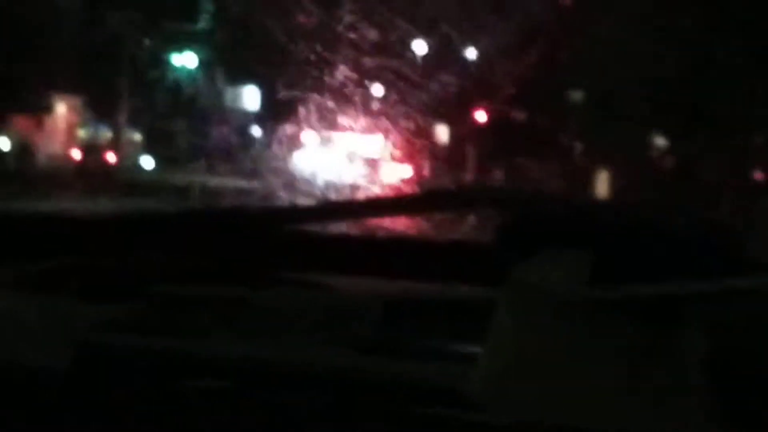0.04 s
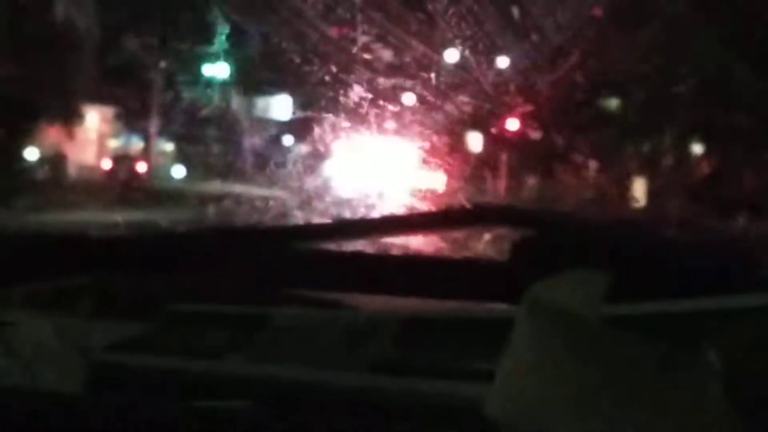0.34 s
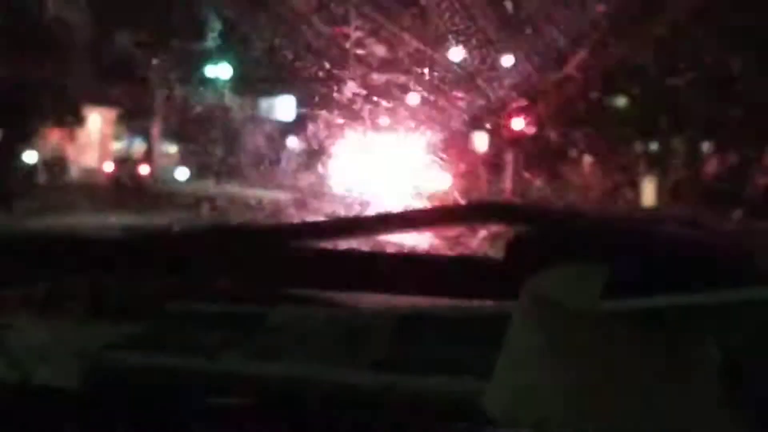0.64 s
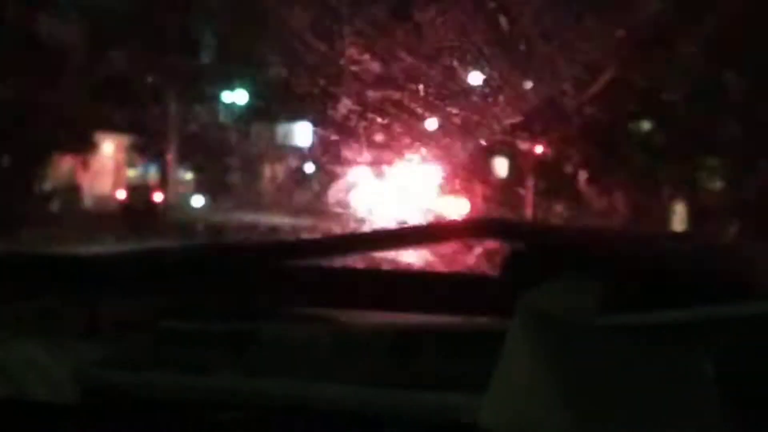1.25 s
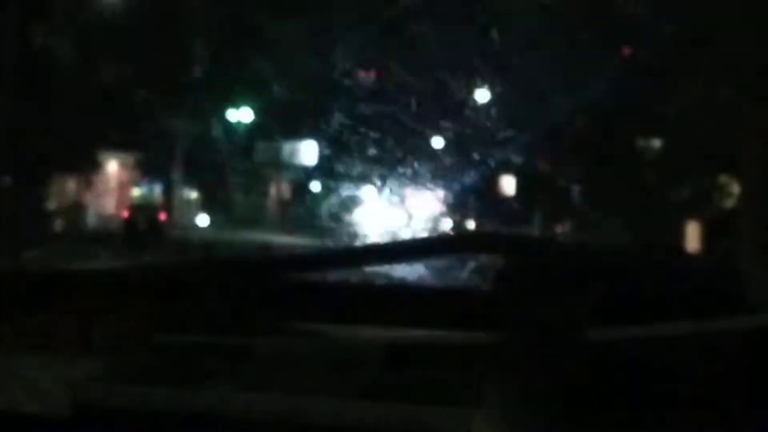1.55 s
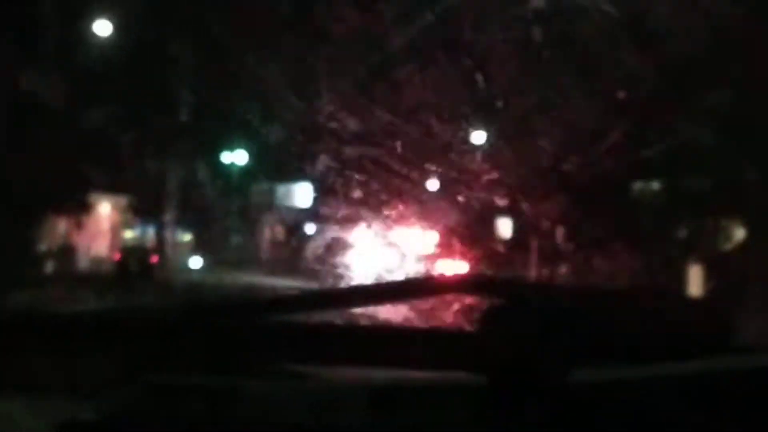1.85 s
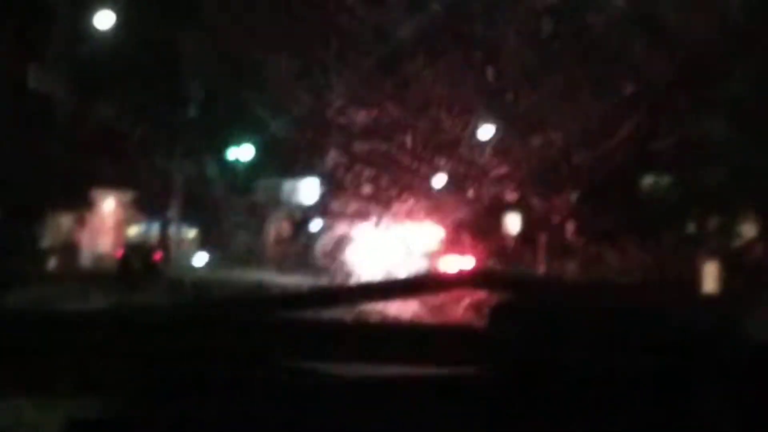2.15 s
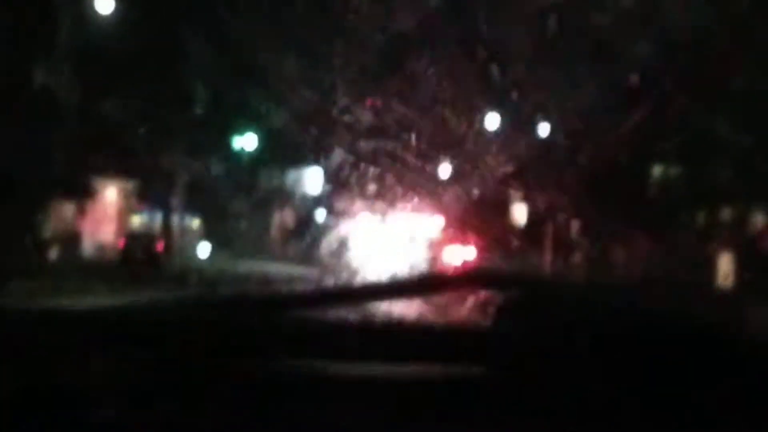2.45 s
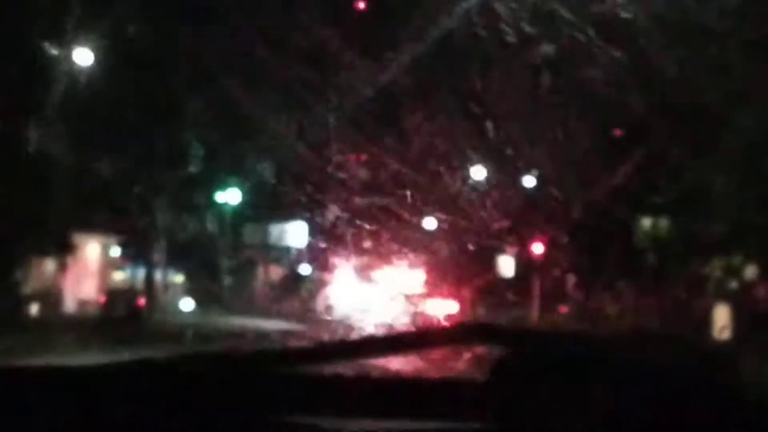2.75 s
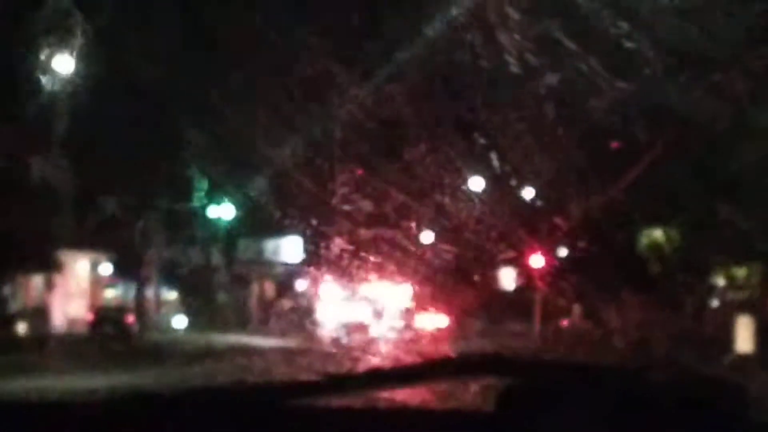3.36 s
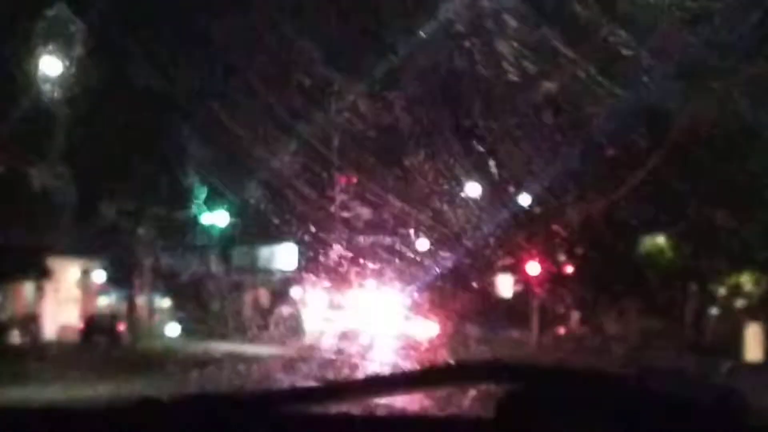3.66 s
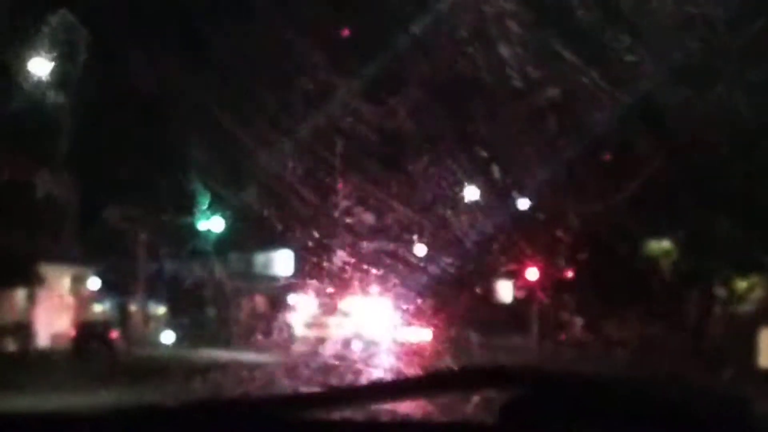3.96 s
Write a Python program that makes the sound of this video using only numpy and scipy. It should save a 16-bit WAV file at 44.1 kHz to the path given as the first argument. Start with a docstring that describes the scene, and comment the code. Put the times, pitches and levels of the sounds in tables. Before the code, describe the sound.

An engine rises in pitch until about 3.4 seconds, then eases, over road rumble, wet tyre wash and faint diesel clatter, heard inside a car. A sharp double air hiss opens. The microphone bumps at 0.5 seconds as a softer, faintly whistling hiss lasts to about 1.5. A loud air blast with a knock comes at 2.5. Small rustles dot the second half, with tyre swishes near 2.9 and 3.2.

```python
"""Pulling away on a wet street

Inside a car at night, behind a fire truck. The engine's firing tones climb and ease off over road
rumble, tyre wash and a steady diesel clatter. Three hisses like released air stand out, jets of noise
with a faint whistle. Small rustles, wet swishes, a knock and a bump on the microphone dot the ride."""
import sys
import numpy as np
from scipy import signal
from scipy.fft import rfft, irfft
from scipy.io import wavfile
from scipy.ndimage import uniform_filter1d

SR = 44100
rng = np.random.default_rng(int(sys.argv[2]) if len(sys.argv) > 2 else 0)


def transcribe(u):
    """Save the signal u as a 16-bit wav file named by the first command-line argument.

    u: samples, shape (n,) or (channels, n), limited to [-1, 1]; the rate is SR.
    q: integer samples, one column per channel.
    """
    v = np.clip(np.atleast_2d(u).T, -1, 1)
    q = np.round(v * 32767).astype(np.int16)
    wavfile.write(sys.argv[1], SR, q)


N = 176400
T, HZ = np.arange(N) / SR, np.fft.rfftfreq(N, 1 / SR)

# The revs (time [s], firing rate [Hz])
ENGINE_REVS = [(0, 81.17), (1, 90.92), (2, 106.2), (3, 120.2), (3.35, 122.8), (3.58, 119.7), (3.78, 107.4),
               (4, 97.7)]
# Weight of the engine note (time [s], firing tone [dB], its octave [dB])
ENGINE_LEVELS = [(0, -61, -42), (.3, -51.5, -50), (.55, -39, -48), (1.05, -44.5, -46), (1.5, -43, -49.5),
                 (1.8, -35, -51), (2.35, -32, -48.5), (2.7, -43, -50.5), (3.1, -42.5, -46), (3.5, -41, -53),
                 (3.78, -31, -47.5), (4, -41.5, -58)]
# Weaker engine orders (pitch [x firing rate], level [dB])
ENGINE_ORDERS = [(.62, -58), (1.39, -54.5), (3, -55.5), (4, -57)]

# Noise bursts (start [s], attack [s], hold [s], release [dB/s], level [dB], tilt [dB/octave])
THIN_HISS_CUES = [(-.04, 0.085, 0.097, 168, -37.5, 1.5), (.17, 0.016, 0.047, 260, -45.5, -0.5)]
LONG_HISS_CUES = [(.43, 0.11, 0.55, 24.4, -53.5, 0)]
WIDE_HISS_CUES = [(2.415, 0.089, .055, 186, -35, 0)]
RUSTLE_CUES = [(1.665, .02, .005, 300, -55, 3), (1.71, 0.068, 0.011, 120, -51.5, -3.5),
               (2.06, 0.014, 0.013, 350, -51.5, -5), (2.139, 0.0024, 0.011, 334, -46.5, -4),
               (2.72, 0.049, 0.0094, 300, -49, -3), (2.812, 0.0024, 0.0057, 700, -48.5, -4.5),
               (2.865, 0.014, 0.014, 200, -43.5, -7), (3.2, 0.06, 0.11, 60, -57, -1),
               (3.321, 0.002, 0.004, 600, -48, 3), (3.555, 0.013, 0.014, 250, -55.5, -2.5),
               (3.795, 0.018, 0.011, 300, -55, -4), (3.89, 0.023, .01, 300, -54.5, -0.5)]
SWISH_CUES = [(2.868, 0.012, 0.11, 88.75, -50, 0), (3.215, 0.0067, 0.042, 44, -43.5, 0)]
# Tone colour of those bursts (frequency [Hz], relative level [dB])
THIN_HISS_EQ = [(300, -1), (1500, -6.5), (2100, 4), (2750, 3.5), (3300, -6), (4300, -3), (4850, 7.5),
                (5500, -1), (7400, -13.5), (9400, -19.5), (10300, -12), (15600, -10), (17000, -60)]
LONG_HISS_EQ = [(1000, -17), (2800, -6.5), (4100, -6), (5500, -2), (7500, -11.5), (9400, -12.5),
                (10500, -8), (12500, -10.5), (15400, -9), (17000, -60)]
WIDE_HISS_EQ = [(300, -11), (1200, 1.5), (2050, -7.5), (3100, 1.5), (4200, -0.5), (5400, 0.5), (7100, -3.5),
                (7800, -11.5), (9300, -6), (10500, -21), (12000, -7), (14600, -4), (15800, -7),
                (17000, -60)]
RUSTLE_EQ = [(800, -33), (3000, 9), (4200, 1.5), (7000, 0), (10000, -5), (14500, 2), (16000, -34.5)]
SWISH_EQ = [(400, -10), (1000, -2), (1900, 7), (3200, 1.5), (4200, -10.5), (5500, -10.5), (15000, -27)]
# Resonances of the air jets (frequency [Hz], half width [Hz], lift [dB])
THIN_JET_PEAKS = [(5400, 70, 5), (5930, 60, 5.5)]
WIDE_JET_PEAKS = [(2950, 91, 6.6), (3255, 25, 4.4), (6170, 41, 7), (6870, 30, 14)]
# Singing air (start [s], length [s], pitch [Hz], bend [Hz], width [Hz], level [dB])
WHISTLE_CUES = [(-.06, 0.14, 11840, -400, 60.3, -49), (.48, .16, 12400, 4000, 700, -55),
                (.62, 0.28, 5530, -220, 35, -58)]
# Sputter at the height of the first hiss (start [s], length [s], level [dB])
SPUTTER_CUES = [(0.105, 0.012, -35), (0.12, 0.027, -36.5)]
# Ring of the sputter and the knock (frequency [Hz], relative level [dB], 60 dB decay [s])
SPUTTER_RING = [(547, 2, 0.028), (1180, 3, 0.0086), (1870, -4.5, 0.021), (2720, -3, 0.011),
                (5300, -6, 0.0068)]
KNOCK_RING = [(1260, 1.5, 0.024), (1430, -9, .03)]

# The road bed (time [s], rumble [dB], tyre wash [dB])
ROAD_LEVELS = [(0, -43, -51.5), (.6, -40.5, -49.5), (1.5, -40, -50), (2.2, -37.5, -48.5),
               (2.7, -36.5, -46.5), (3.5, -35.5, -46.5), (4, -38.5, -48.5)]
# Lumps in the rumble (time [s], frequency [Hz], level [dB])
ROAD_LUMPS = [(2.59, 135, -40), (3.12, 169, -38)]
# Tone colour of the background (frequency [Hz], relative level [dB])
RUMBLE_EQ = [(38, -26), (58, -4), (85, -3), (125, -3.5), (175, -1.5), (240, -4), (295, -13), (390, -8.5),
             (560, -14), (1500, -79)]
WASH_EQ = [(200, -19), (450, -1.5), (700, 2.5), (1050, -4.5), (1500, -14), (2000, -16.5), (3000, -22.5),
           (4000, -25.5), (6000, -26.5), (9000, -41.5), (16000, -30)]
FIZZ_EQ = [(1000, 7.5), (3000, 17.5), (5500, -5), (8000, -2), (11000, 0), (15500, 1.5)]
DIESEL_EQ = [(500, -7), (1700, 1.5), (2150, 6.5), (2700, 13.5), (3400, -3), (4100, -2), (6000, -11.5),
             (12000, -50)]


def engine():
    """Firing tone and orders ride one rev curve, leaning right; the cabin drones briefly on the climb."""
    def tone(angle, db):
        flutter_db = drift(5.8)
        return np.sqrt(2) * amp(db + flutter_db) * np.sin(angle + 2 * np.pi * rng.random())
    drone_s, drone_hz, glide_hz_per_s = 2.4, 157, 20
    phase = sweep(curve(ENGINE_REVS) * (1 + .0059 * drift(16.5)))
    firing = tone(phase, curve(ENGINE_LEVELS))
    octave = tone(2 * phase, curve(ENGINE_LEVELS, column=2))
    orders = sum(tone(order * phase, db) for order, db in ENGINE_ORDERS)
    drone = tone(sweep(drone_hz + glide_hz_per_s * (T - drone_s)), db=-39.5)
    upper = octave + orders + drone * swell(drone_s, width_s=.33)
    return firing * pan(-13, 1.8) + upper * pan(-1.5, .5)


def air_hisses():
    """Turbulent jets with narrow resonances: a thin double spit, a long fading breath, a wide blast."""
    thin = bursts(THIN_HISS_CUES, THIN_HISS_EQ, grain_db=.7, peaks=THIN_JET_PEAKS)
    long = bursts(LONG_HISS_CUES, LONG_HISS_EQ, grain_db=.5, peaks=THIN_JET_PEAKS)
    wide = bursts(WIDE_HISS_CUES, WIDE_HISS_EQ, grain_db=.9, peaks=WIDE_JET_PEAKS)
    return thin + long + wide


def whistles():
    """The escaping air sings in fuzzy tones that bend in pitch."""
    out = np.zeros((2, N))
    for start, length, hz, bend_hz, width_hz, db in WHISTLE_CUES:
        progress = np.clip((T - start) / length, 0, 1)
        phase = sweep(hz + bend_hz * progress)
        band = np.exp(-(HZ / width_hz) ** 2)
        tone = noise(band, shared=0) * np.cos(phase) + noise(band, shared=0) * np.sin(phase)
        out += amp(db) * np.sin(np.pi * progress) * unit(tone)
    return out


def sputter(pulses_per_s=720):
    """Short flurries of irregular pulses ring a few damped resonances."""
    out, ring = np.zeros((2, N)), ringing(SPUTTER_RING)
    for start, length, db in SPUTTER_CUES:
        gate = (T > start) & (T < start + length)
        pulses = (rng.random(N) < pulses_per_s / SR) * rng.choice([-1, 1], N)
        breath = .037 * rng.standard_normal((2, N))
        flurry = signal.oaconvolve(gate * (pulses + breath), ring[None], axes=1)[:, :N]
        out += amp(db) * np.sqrt(length * SR / N) * unit(flurry)  # level over the flurry's own length
    return out


def knock(at_s=2.5385):
    """One hard blow rings briefly at the height of the loudest hiss."""
    blow = amp(-31.5) * (np.arange(N) == round(at_s * SR))
    return signal.oaconvolve(blow, ringing(KNOCK_RING))[:N]


def microphone_bump(at_s=.501, tick_hz=825, tick_s=.00045, thud_hz=130, thud_s=.0052):
    """A dull tick, then a thud that pushes the microphone's two ports in opposite ways."""
    t = T - at_s
    tick = -amp(-22) * np.exp(-(t / tick_s) ** 2) * np.sin(2 * np.pi * tick_hz * t)
    thud = amp(-20) * np.exp(-(t / thud_s - .5) ** 2) * np.sin(2 * np.pi * thud_hz * t)
    return np.array([tick - thud, tick + thud])


def rustles():
    """Small, crisp flicks of grainy noise."""
    return bursts(RUSTLE_CUES, RUSTLE_EQ, grain_db=1)


def tyre_swishes():
    """Tyres splash on the wet street: two quick swishes with soft tails."""
    return bursts(SWISH_CUES, SWISH_EQ, grain_db=.5)


def road(cabin_hz=463.5, cabin_width_hz=27, lump_width_hz=27):
    """Lumpy rumble, tyre wash and a cabin resonance build over a faint, steady fizz."""
    rumble_db, wash_db = curve(ROAD_LEVELS), curve(ROAD_LEVELS, column=2)
    rumble = noise(colour(RUMBLE_EQ), shared=.37) * amp(rumble_db + .58 * drift(23)) * pan(-.8, .6)
    wash = noise(colour(WASH_EQ), shared=.28) * amp(wash_db + 1.47 * drift(29))
    bloom_db = 3.5 * (swell(2.82, width_s=.1) + swell(3.02, width_s=.1))
    cabin = noise(resonance(cabin_hz, cabin_width_hz), shared=1) * amp(wash_db + bloom_db)
    for at_s, hz, db in ROAD_LUMPS:
        band = np.exp(-((HZ - hz) / lump_width_hz) ** 2)
        rumble += amp(db) * swell(at_s, width_s=.1) * noise(band, shared=.57)
    fizz = amp(-58) * noise(colour(FIZZ_EQ), shared=.034)
    return rumble + wash + cabin + fizz


def diesel(firings_per_s=42, decay_s=.0025, spread_db=1.5, level_db=-54.5):
    """Each firing of an idling diesel gives a short, bright rattle over a steady bed of noise."""
    firings = np.cumsum(firings_per_s * (1 + .005 * drift(5.2))) / SR
    strength = amp(spread_db * rng.standard_normal(N))[firings.astype(int)]
    age_s = (firings % 1) / firings_per_s
    envelope = .38 + strength * np.exp(-age_s / decay_s)
    return amp(level_db) * unit(envelope * noise(colour(DIESEL_EQ), shared=.062))


def bursts(cues, eq, grain_db, peaks=()):
    """Fine-grained noise that swells, holds and dies away on each cue."""
    out, grain = np.zeros((2, N)), unit(amp(grain_db * drift(140)))
    gain = colour(eq) * amp(sum(db * resonance(hz, width) for hz, width, db in peaks))
    for start, attack, hold, release, db, tilt_db in cues:
        rise = np.sin(np.pi / 2 * np.clip((T - start) / attack, 0, 1)) ** 2
        level = amp(db - release * np.maximum(T - start - attack - hold, 0))
        out += rise * level * noise(gain * amp(tilt_db * np.log2(HZ + 1)), shared=.081)
    return out * grain


def noise(gain, shared):
    """Stereo noise with a share of its power in the centre; cabin reflections ripple its spectrum."""
    white = rng.standard_normal((3, N))
    pair = np.sqrt(shared) * white[2] + np.sqrt(1 - shared) * white[:2]
    ripple = uniform_filter1d(rng.standard_normal(len(HZ)), size=100)
    ripple = unit(uniform_filter1d(ripple, size=100))
    ripple_db = 2.2 * ripple * HZ / (HZ + 300)  # smoother in the bass
    return unit(irfft(rfft(pair) * gain * amp(ripple_db), N))


def ringing(modes):
    """The ring of one strike: a sum of damped sines."""
    t = np.arange(4000) / SR
    return sum(amp(db - 60 * t / t60) * np.sin(2 * np.pi * hz * t) for hz, db, t60 in modes)


def resonance(hz, half_width_hz):
    """A peak in the spectrum, of height 1."""
    return 1 / (1 + ((HZ - hz) / half_width_hz) ** 2)


def colour(eq):
    """Gain per frequency from an EQ curve."""
    hz, db = np.transpose(eq)
    return amp(np.interp(np.log(HZ + 1), np.log(hz), db))


def curve(table, column=1):
    """An automation lane: one column, joined by straight lines in time."""
    rows = np.array(table)
    return np.interp(T, rows[:, 0], rows[:, column])


def swell(at_s, width_s):
    """A smooth rise and fall, of height 1."""
    return np.exp(-((T - at_s) / width_s) ** 2)


def drift(rate_hz):
    """Smooth random motion of rms 1."""
    return unit(irfft(rfft(rng.standard_normal(N)) / (1 + (HZ / rate_hz) ** 4), N))


def sweep(hz):
    """Phase of a gliding pitch."""
    return 2 * np.pi * np.cumsum(hz) / SR


def pan(left_db, right_db):
    """A gain for each side."""
    return amp([[left_db], [right_db]])


def amp(db):
    """Decibels to gain."""
    return 10 ** (np.asarray(db) / 20)


def unit(x):
    """Scales to rms 1."""
    return x / np.sqrt(np.mean(x ** 2) + 1e-20)


def scene():
    """Engine, road and diesel carry the ride; hisses and small accents sit on top."""
    hisses = air_hisses()
    accents = rustles() + tyre_swishes() + microphone_bump()
    ride = engine() + road() + diesel()
    return ride + hisses + whistles() + sputter() + knock() + accents


def record(dry, crossfeed=.71, delay_s=20 / SR, bass_hz=520, cutoff_hz=15800):
    """Widens the image by subtracting a delayed copy of the other side above the bass; trims the top."""
    above_bass = HZ ** 4 / (HZ ** 4 + bass_hz ** 4)
    feed = crossfeed * np.exp(-2j * np.pi * HZ * delay_s) * above_bass
    spectrum = rfft(dry)
    wide = irfft((spectrum - feed * spectrum[::-1]) / np.sqrt(1 + abs(feed) ** 2), N)
    lowpass = signal.firwin(511, cutoff_hz, window=("kaiser", 9), fs=SR)
    return signal.oaconvolve(wide, lowpass[None], "same")


dry = scene()
out = record(dry)
transcribe(out)
```